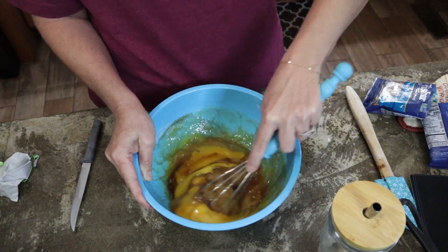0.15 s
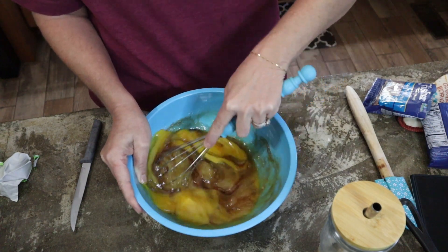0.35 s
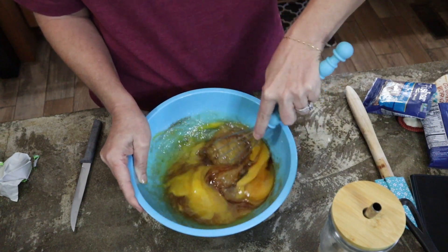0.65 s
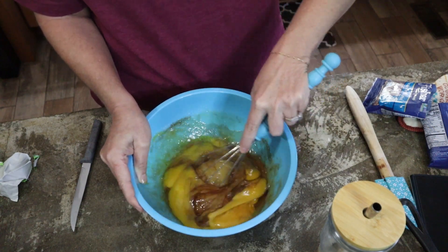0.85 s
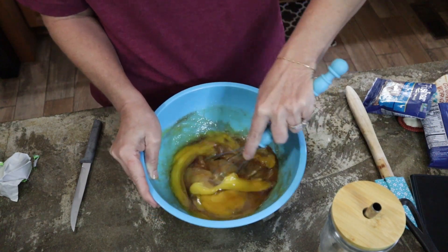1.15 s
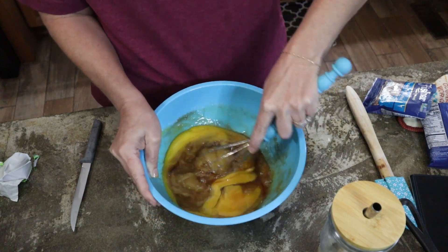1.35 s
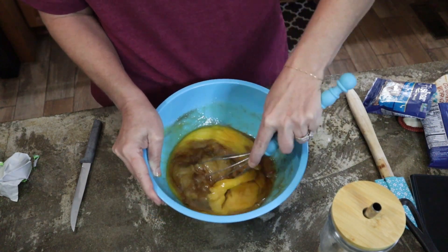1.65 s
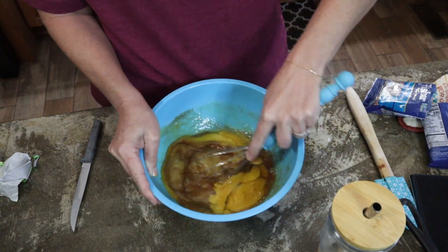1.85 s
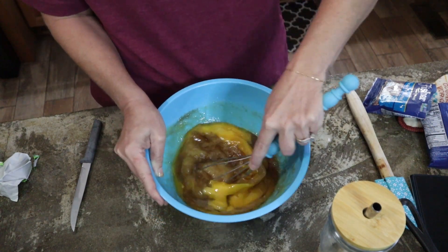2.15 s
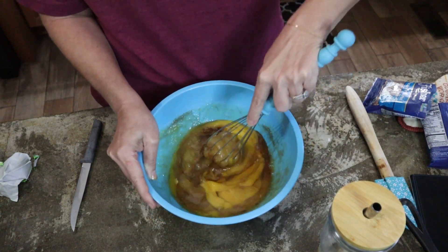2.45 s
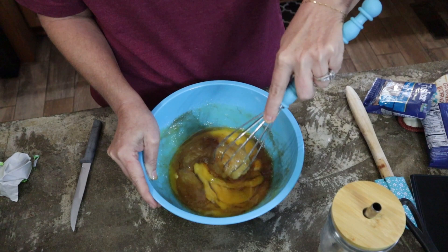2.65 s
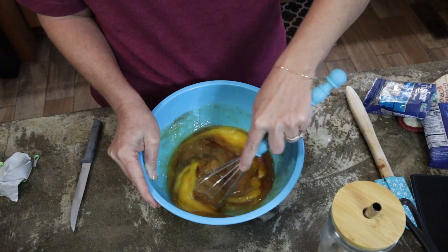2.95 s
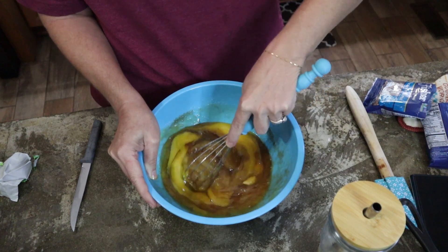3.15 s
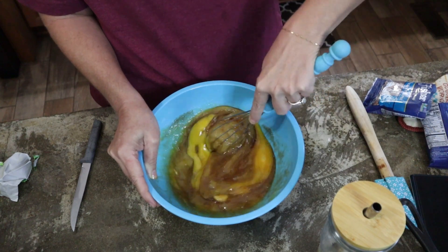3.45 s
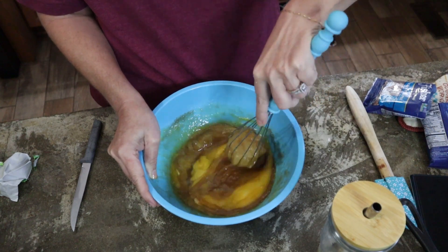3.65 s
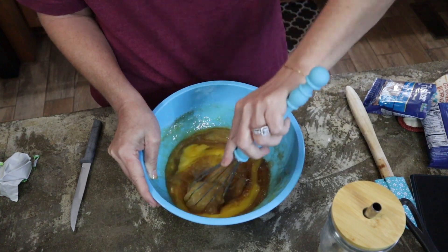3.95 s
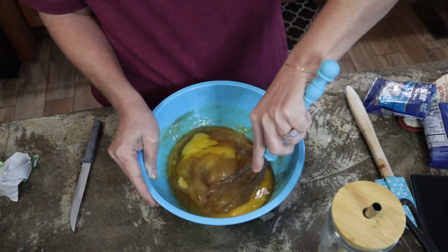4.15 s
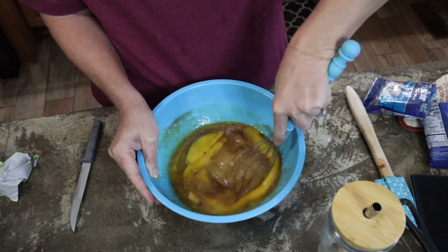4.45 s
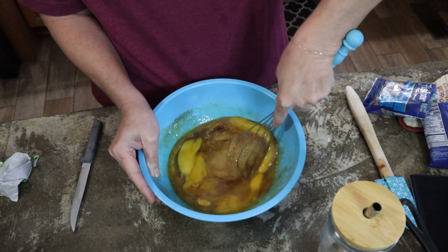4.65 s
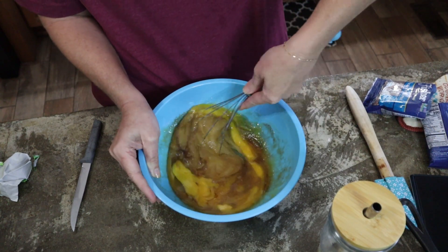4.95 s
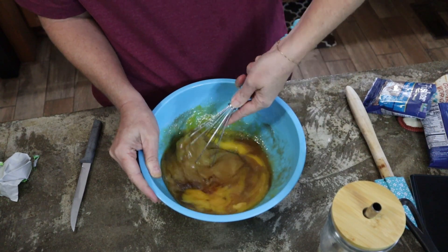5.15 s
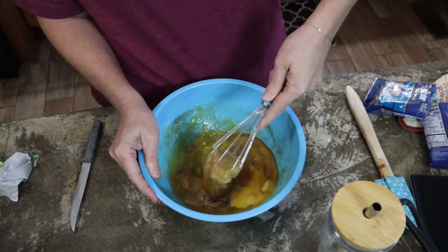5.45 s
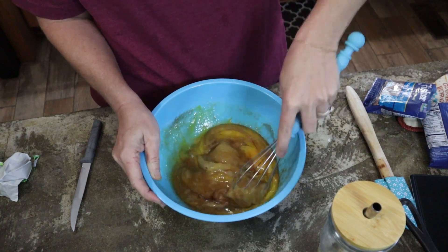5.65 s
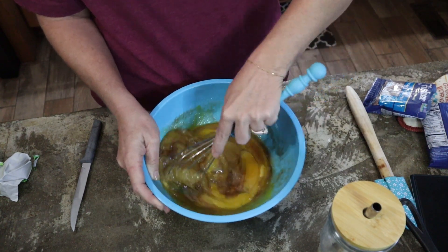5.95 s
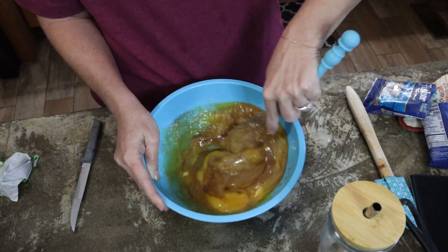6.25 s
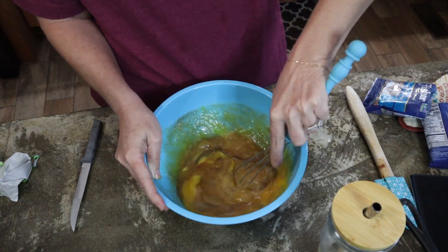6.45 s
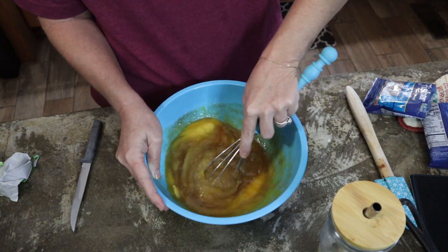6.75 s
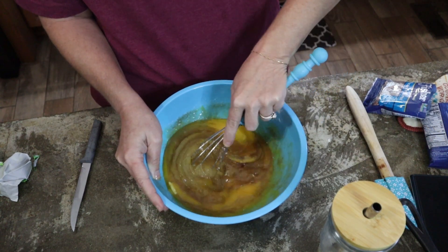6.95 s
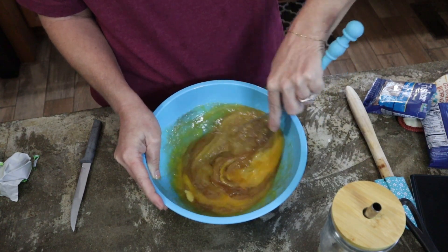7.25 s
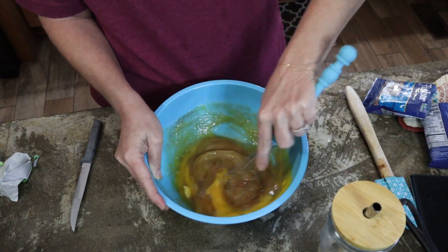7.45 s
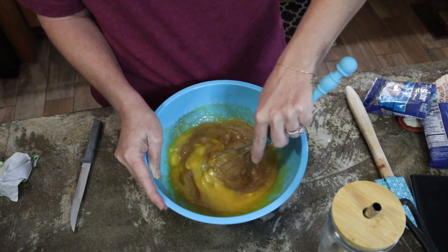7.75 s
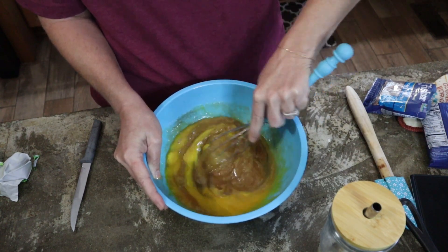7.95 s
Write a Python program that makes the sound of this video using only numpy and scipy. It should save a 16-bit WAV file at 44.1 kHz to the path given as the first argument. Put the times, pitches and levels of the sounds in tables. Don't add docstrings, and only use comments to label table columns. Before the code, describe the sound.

A close stereo microphone hears whisking in a small kitchen with short wall reflections, low hum and soft hiss. Throughout, a wind-up timer further off ticks and tocks a little over four times a second, slightly limping. A whisk rasps softly at 0.3 s and knocks the plastic bowl at 0.5 s. The strongest hollow thump comes at 1.2 s, followed by heavy rubbing, rumble and knocks at 1.5 and 2.0 s, and the rim landing at 2.55 s. A very sharp, bright wire click springs out at 2.9 s. Lighter wet scraping follows to 4.7 s, then a cluster of metallic snaps and a sticky suck around 4.9 s. Further rasps and pings come at 5.9 s, a loud short twang at 6.2 s, then softer drags, light touches and snaps around 7.1-7.3 s, ending with brief scrapes near 7.8-8 s.

```python
import sys
import numpy as np
from scipy import signal
from scipy.fft import rfft, irfft, next_fast_len
from scipy.io import wavfile

SR = 44100
rng = np.random.default_rng(int(sys.argv[2]) if len(sys.argv) > 2 else 0)


def convert_level_to_amplitude(level_db):
    exponent = np.asarray(level_db, float) / 20
    return 10 ** exponent


def generate_wav(sig):
    pcm = np.round(np.clip(np.atleast_2d(sig).T, -1, 1) * 32767).astype(np.int16)
    wavfile.write(sys.argv[1], SR, pcm)


N = 356769

# (frequency [Hz], density [dB per Hz])
ROOM = [(12, -61), (20, -24), (60, -9), (86, -17), (128, -7.5), (212, -9.5), (332, -10), (440, -12.5),
        (479, -13.5), (1180, -18.5), (1650, -22), (3060, -23.5), (12800, -32), (15200, -28), (16500, -53)]
# (frequency [Hz], likeness [0..1])
LIKENESS = [(60, 0.95), (180, 0.68), (550, 0.23), (1650, 0.28), (4970, 0.5), (15000, 0.52)]
ROOM_DB = -53
HUM_HZ, HUM_T60_S, HUM_DB = 123.5, 0.21, -58.5

# (start [s], length [s], wet scrape [dB], brightness [dB], load on bowl [dB])
DRAGS = [(0.0, 0.029, -60, 2, -71), (0.294, 0.019, -46, -4, -55), (0.337, 0.35, -53.5, -7, -51.5),
         (1.421, 0.15, -50.5, -7.5, -41), (0.789, 0.13, -54, -5, -47), (0.953, 0.41, -47.5, -11.5, -41.5),
         (1.098, 0.12, -61, -24, -34.5), (1.49, 0.85, -46, -11, -39), (1.799, 0.05, -46, -7, -43),
         (2.9, .03, -75, -1, -61), (3.025, 0.47, -56.5, -10.5, -55), (4.082, 0.5, -55, -3, -53.5),
         (4.644, 0.38, -57.5, -3, -55.5), (4.859, 0.035, -50, -1.5, -62), (4.915, .09, -50.5, -0.5, -64),
         (4.999, 0.055, -48.5, -2.5, -65), (6.22, .035, -53, 5.5, -62), (5.105, 0.13, -53.5, -9, -54.5),
         (5.789, 0.04, -50.5, -4.5, -49), (5.865, 0.057, -50, -0.5, -51.5), (5.974, 0.22, -55.5, -7, -52),
         (6.155, 0.22, -54, 1.5, -52.5), (6.406, 0.16, -53.5, -7.5, -48.5), (6.617, 0.64, -56, -7.5, -52.5),
         (7.275, 0.17, -54, 3.5, -54), (7.792, 0.055, -47.5, -6.5, -44), (7.894, 0.033, -53, -9, -51),
         (7.96, .05, -52, -7, -51)]
# (start [s], length [s], rumble [dB])
SHOVES = [(0.326, 0.022, -42), (0.367, 0.047, -43), (0.793, 0.055, -46), (1.365, .03, -43.5),
          (1.646, 0.078, -41.5), (1.895, 0.034, -35.5), (2.387, 0.014, -42.5), (2.978, 0.041, -55),
          (5.124, 0.066, -52.5), (5.804, 0.074, -49), (5.96, 0.031, -45.5), (6.99, 0.16, -65),
          (7.513, 0.29, -57.5)]
DRAG_ATTACK_S, DRAG_RELEASE_DB_PER_S = 0.01, 152
STIRRING_DB = -66.5
RUMBLE_DB = -11
HEAVY_DB, RUMBLE_GROWTH = -42, 0.21
ROCK_DB, ROCK_DB_PER_S = -15.5, 259
# (frequency [Hz], density [dB per Hz])
SCRAPE = [(530, 1.5), (900, 0.5), (1180, -3.5), (1470, -7), (1900, -4), (2880, -7), (3220, -1), (4600, -8),
          (5440, -9), (6010, -10.5), (7860, -17), (8990, -10.5), (13000, -7)]
# (frequency [Hz], level [dB])
WIRES = [(2250, -20), (3250, -28), (4400, -16), (5300, -14), (7900, -1.5)]

# (time [s], peak [dB], wire pitch [Hz], wall pitch [Hz], wall share [dB])
TAPS = [(0.0176, -33, 6330, 1140, -7), (2.248, -38, 5430, 1040, 5), (2.896, -33, 6600, 3030, -26),
        (2.9, -29, 3520, 1800, -8), (4.251, -33, 4800, 1450, -3), (4.107, -44, 3100, 1440, 0),
        (4.1666, -42, 2400, 1240, 3), (4.2255, -44, 2600, 1140, 2), (5.233, -40, 5040, 3000, -14),
        (4.869, -22.5, 7700, 3600, -5), (4.871, -21.5, 7500, 4300, -9), (4.887, -26, 4140, 1530, -7),
        (4.9412, -35, 3400, 2500, -6), (5.065, -30, 7300, 2020, -14), (5.154, -33, 6200, 1050, -17),
        (5.197, -41.5, 4230, 1200, 7), (5.8393, -36, 5130, 2460, -15), (1.612, -40, 3200, 1800, 9),
        (1.648, -42, 3000, 2190, 9), (2.18, -36, 3600, 1200, -13), (2.31, -40.5, 3200, 1100, 10.5)]
# (time [s], peak [dB], wire pitch [Hz], wall pitch [Hz], wall share [dB])
RASPS = [(0.311, -27, 3600, 1020, -5.5), (0.416, -28.5, 3480, 1100, -10.5), (0.5885, -43, 4410, 2230, 2.5),
         (0.894, -36, 7450, 2360, -3), (3.0112, -27, 8050, 1260, -11), (3.249, -51, 4300, 980, 8.5),
         (4.974, -29, 3600, 2160, -21), (4.98, -27.5, 3900, 2540, -14), (5.13, -37, 5700, 1750, -1),
         (5.655, -32.5, 4530, 3130, -31), (5.874, -26, 8650, 6270, -13), (5.97, -28.5, 4050, 1100, -8),
         (6.187, -29, 8100, 2640, -16), (6.3672, -31, 3940, 1020, -9), (7.1708, -32, 5150, 2450, -19),
         (7.274, -28, 4500, 2830, -8), (7.7978, -29.5, 8700, 960, -3), (7.852, -33, 3250, 1850, 1),
         (7.977, -45.5, 4010, 1710, 5), (7.992, -46, 3500, 1300, 5), (1.329, -45, 3150, 1900, 8)]
# (time [s], peak [dB], wire pitch [Hz], wall pitch [Hz], wall share [dB])
PINGS = [(3.0065, -36, 4100, 2300, 0), (3.0088, -34.5, 4000, 2100, 1.5), (3.0128, -30, 4160, 1240, -5),
         (3.017, -36, 4200, 1000, -5), (3.021, -37, 4300, 1300, -4), (5.8743, -23.5, 4200, 1303, -6),
         (5.878, -25.5, 4170, 1250, -11), (5.88, -30, 4700, 2500, -5), (7.2718, -29.5, 3400, 2050, 3),
         (5.797, -42, 4100, 1000, -1), (5.81, -45, 4050, 1100, -4), (5.826, -43, 4100, 5530, -3),
         (5.848, -42, 4100, 2400, -6), (6.171, -38, 2800, 2500, 1), (0.707, -39, 3600, 4000, -6),
         (0.717, -39, 3550, 3100, -6), (7.8535, -39, 3240, 1940, 4), (6.211, -35, 2700, 2700, 1),
         (6.2785, -36.5, 4100, 2150, 7)]
# (time [s], peak [dB], wire pitch [Hz], wall pitch [Hz], wall share [dB])
DULL_TAPS = [
    (1.0892, -32.5, 3230, 2100, 1),
    (1.154, -32, 3400, 2300, 1),
    (1.179, -47, 2390, 1680, 1),
    (5.129, -41, 2400, 1710, 0),
]
# (time [s], peak [dB], wire pitch [Hz])
SNAPS = [(4.48, -44, 4360), (4.765, -30, 5030), (4.816, -31, 4200), (4.8724, -33, 7900), (5.403, -35, 7360),
         (6.631, -33.5, 3950), (7.0852, -27, 4150), (7.099, -30, 5200), (7.214, -31, 4780),
         (7.362, -31, 4000), (7.385, -41, 3630)]
# (time [s], peak [dB], pitch [Hz], second pitch [Hz], t60 [s])
SPRING = [
    (2.8995, -27, 14500, 12500, .003),
    (2.901, -24, 8300, 5500, 0.0088),
    (2.905, -30, 10300, 8800, 0.007),
    (2.9092, -32, 8600, 10300, 0.01),
    (2.914, -48, 10200, 8500, 0.11),
    (4.8855, -31, 11500, 14500, 0.0045),
    (4.983, -25, 10500, 14000, .008),
    (5.2626, -26, 7850, 10000, 0.0031),
]
# (time [s], peak [dB], pitch [Hz], second pitch [Hz], t60 [s])
TWANGS = [
    (6.2224, -17.5, 7750, 7500, .007),
    (6.2331, -36, 8000, 9200, .05),
    (5.0846, -20, 5100, 5700, .004),
]
# (time [s], peak [dB])
CLICKS = [(2.8996, -9), (2.9002, -11.5), (2.9012, -19), (5.8748, -25), (5.8785, -19), (3.0135, -28),
          (2.6, -33), (4.8698, -20), (4.8722, -22), (4.8875, -18), (4.942, -29), (4.9835, -25),
          (4.921, -33), (6.5, -33), (0.3125, -26), (7.799, -27), (7.8545, -32), (7.844, -35), (6.272, -33),
          (7.9, -35)]
# (frequency [Hz], level [dB], t60 [s])
CLICK = [(1490, -8, 0.0025), (2700, -7, .002), (4300, -4, .0015), (6200, -1, 0.0013), (8300, 1.5, 0.0018),
         (10200, -1, 0.0011), (14500, -4, .001)]
TAP_T60_S, SNAP_T60_S, RASP_T60_S, PING_T60_S = .005, .008, 0.032, .012
SNAP_WALL_HZ, SNAP_WALL_DB = 1110, -12.5
SPRING_SECOND_DB = -6

# (frequency [Hz], level [dB], t60 [s])
TIMER = [(2370, -16, 0.0034), (3130, 1, 0.046), (3690, 7, 0.024), (4360, 10, 0.019), (4440, 3, 0.015),
         (4790, 19.5, 0.0063), (5700, 18.5, 0.0041), (7380, 11.5, 0.024), (7900, -1, 0.017),
         (8300, 13, 0.024), (8250, -21, 0.045), (10200, -1, 0.0052)]
FIRST_TICK_S, TOCK_AFTER_S, SWING_S = .0742, .2298, .44826
TICK_DB, TICK_UPPER_DB, TICK_LOWER_DB = -42, -3, 5.5
TOCK_DB, TOCK_UPPER_DB, TOCK_LOWER_DB = -42.5, -0.5, 2

# (time [s], peak [dB], counter share [dB], wall share [dB])
KNOCKS = [(0.31, -35.5, -9, -20), (0.477, -20.5, -19, -6), (0.59, -34.5, -25, -27), (0.927, -25, -9.5, -9),
          (0.97, -52, 12, -12), (1.089, -30.5, -22, -12), (1.1553, -26, -20, -4), (1.18, -11, -16, -10.5),
          (1.476, -27, -10, -11), (1.509, -15.5, -14, -6), (1.681, -28, -16, -22), (1.739, -30, -14, -19),
          (1.793, -34, -14, -15), (1.962, -19, -12.5, -6.5), (2.133, -29, -38, -8),
          (2.165, -23.5, -17, -20), (2.555, -25, -3, -5), (3.013, -38.5, -7, -22), (5.525, -39, -27, -30),
          (5.874, -35, -15, -30), (6.19, -35.5, -14, -29), (6.223, -31.5, -25, -35),
          (6.272, -34.5, -26, -41), (6.364, -34, -29, -26), (6.448, -41, -32, -30), (6.576, -36, -36, -24),
          (7.085, -39.5, -11, -25), (7.273, -32.5, -19, -38), (7.798, -37, -30, -15), (7.852, -48, -25, 1)]
# (time [s], peak [dB])
NUDGES = [(1.337, -43), (1.377, -37), (1.445, -38), (1.572, -38), (1.647, -48), (1.714, -37), (1.812, -38),
          (1.83, -35), (1.883, -33), (1.918, -42), (2.903, -43.5), (2.012, -33), (2.087, -38), (2.213, -32),
          (2.261, -36), (2.35, -43), (0.375, -42), (5.915, -38), (5.927, -58), (6.171, -42), (6.213, -45),
          (6.28, -35), (6.297, -44), (6.552, -46), (6.633, -48), (6.805, -41), (7.173, -43.5), (7.385, -43),
          (7.483, -46), (7.435, -46), (7.56, -53), (7.6, -48), (7.71, -47), (2.65, -43.5), (0.52, -38),
          (1.135, -36), (1.25, -33), (7.83, -41), (7.913, -51)]
NUDGE_COUNTER_DB, NUDGE_WALL_DB = -15.5, -23
# (frequency [Hz], level [dB], t60 [s])
COUNTER = [(84, -36, 0.042), (92, -7, 0.16), (122.5, 4.5, 0.099)]
# (frequency [Hz], level [dB], t60 [s])
WALL = [(227, -3.5, 0.057), (290, 2.5, 0.049), (352.5, 0.5, 0.025)]
# (frequency [Hz], level [dB], t60 [s])
CAVITY = [(414, -15, 0.093), (496.6, -1.5, 0.096), (595, -2.5, 0.084), (663, 5, 0.076), (705, 8, 0.021),
          (835, -6, 0.057), (880, -20.5, 0.1), (958, -5.5, 0.029), (1186, -6, 0.018), (1290, -26, 0.068),
          (1690, -19, 0.0072)]
# (time [s], peak [dB])
SLAPS = [(0.927, -33), (1.0895, -26), (1.1549, -13.5), (1.1807, -12.5), (1.509, -28), (1.681, -29),
         (1.9622, -22), (2.132, -38), (2.166, -34), (7.803, -33), (7.665, -36)]
# (frequency [Hz], level [dB], t60 [s])
SLAP = [(640, -5, 0.013), (804, 0.5, 0.014), (1084, -3, 0.013), (1450, -23.5, 0.0079), (1850, -19, 0.0086)]
# (time [s], peak [dB])
RIM_HITS = [
    (2.5562, -17),
    (0.3125, -31.5),
    (7.8535, -38),
]
# (frequency [Hz], level [dB], t60 [s])
RIM = [(430, 0, 0.057), (722, 1, 0.052), (1180, -19, 0.047)]
PAD_HZ = 2100

# (start [s], length [s], level [dB])
SLOSHES = [
    (3.2, 0.079, -58),
    (4.878, 0.19, -54),
    (5.8, 0.16, -60),
    (6.153, .06, -54),
    (6.27, 0.068, -55),
    (7.29, 0.04, -61),
    (7.852, 0.026, -63),
    (7.96, 0.052, -65),
    (7.648, 0.018, -59),
]
KITCHEN_T60_S, WALL_CUT_HZ = 0.26, 11000
BASS_CUT_HZ = 87


def rms_one(x):
    return x / np.sqrt(np.mean(x ** 2) + 1e-20)


def at_hz(points, hz):
    table_hz, value = np.array(points).T
    return np.interp(np.log(hz), np.log(table_hz), value)


def drift(rate):
    r = np.exp(-80 * np.pi * rate / SR)
    slow = signal.lfilter([1], [1, -2 * r, r * r], rng.standard_normal(N // 40 + 2002))[2000:]
    return np.interp(np.arange(N) / 40, np.arange(len(slow)), rms_one(slow))


def ring(clicks, hz, t60):
    r, w = convert_level_to_amplitude(-60 / (max(t60, .001) * SR)), 2 * np.pi * hz / SR
    return signal.lfilter([0, np.sin(w)], [1, -2 * r * np.cos(w), r * r], clicks + 1e-18)


def colour(x, spectrum):
    size = next_fast_len(N)
    hz = np.maximum(np.arange(size // 2 + 1) * SR / size, 1)
    return irfft(rfft(x, size) * convert_level_to_amplitude(at_hz(spectrum, hz)), size)[..., :N]


def filtered(x, order, hz, kind):
    return signal.sosfilt(signal.butter(order, hz, kind, fs=SR, output="sos"), x)


def grains(per_s, spread_db):
    sizes = convert_level_to_amplitude(spread_db * np.minimum(rng.exponential(1, N), 5)) * rng.choice([-1, 1], N)
    return rms_one(sizes * (rng.random(N) < per_s / SR))


def pair(x, lead):
    turn = np.exp(1j * np.pi * lead * np.arange(len(x) // 2 + 1) / len(x))
    return irfft(rfft(x) * np.array([turn, 1 / turn]), len(x))


def struck(hits, modes):
    clicks = np.zeros(N)
    s, peak_db = np.transpose(hits)
    clicks[(s * SR).astype(int)] = convert_level_to_amplitude(peak_db - 6.5)
    return sum(convert_level_to_amplitude(db) * ring(clicks, hz, t60) for hz, db, t60 in modes)


def held(t, s, length):
    attack = np.clip((t - s) / DRAG_ATTACK_S, 0, 1)
    return attack * convert_level_to_amplitude(-DRAG_RELEASE_DB_PER_S * np.maximum(t - s - length, 0))


def room_tone():
    shared, left, right = rng.standard_normal((3, N))
    likeness = [(hz, np.clip(c, .01, .99)) for hz, c in LIKENESS]
    alike = [(hz, 10 * np.log10(c)) for hz, c in likeness]
    apart = [(hz, 10 * np.log10(1 - c)) for hz, c in likeness]
    both = colour(shared, alike) + colour(np.array([left, right]), apart)
    return convert_level_to_amplitude(ROOM_DB) * rms_one(colour(both, ROOM))


def hum():
    return convert_level_to_amplitude(HUM_DB) * rms_one(ring(rng.standard_normal(N), HUM_HZ, HUM_T60_S))


def drags():
    t = np.arange(0, N / SR + .004, .002)

    def total(level_db, s, length):
        return ((convert_level_to_amplitude(level_db) * held(t, s, length)) ** 2).sum(axis=0)

    s, length, wet_db, bright_db, load_db = np.array(DRAGS).T[:, :, None]
    stirring = convert_level_to_amplitude(2 * STIRRING_DB)
    wet = total(wet_db, s, length) + stirring
    hiss = total(wet_db + bright_db, s, length) + stirring
    load = total(load_db, s, length) + stirring
    knock_s, peak_db = np.array(KNOCKS).T[:2, :, None]
    fall_db = ROCK_DB_PER_S * np.maximum(t - knock_s, 0)
    rocking = (t > knock_s) * convert_level_to_amplitude(peak_db + ROCK_DB - fall_db)
    s, length, shove_db = np.array(SHOVES).T[:, :, None]
    rumble = load * convert_level_to_amplitude(2 * RUMBLE_DB) * (load / convert_level_to_amplitude(2 * HEAVY_DB)) ** RUMBLE_GROWTH
    rumble = rumble + (rocking ** 2).sum(axis=0) + total(shove_db, s, length)
    layers = (rumble, load, wet, hiss)
    return [np.interp(np.arange(N) / SR, t, 10 * np.log10(power)) for power in layers]


def scrape(wet_db, hiss_db):
    pitches, dealt = np.geomspace(1100, 12000, 18), rng.integers(0, 18, N)
    slips = grains(5000, spread_db=2.5) * convert_level_to_amplitude(2.0 * drift(29))
    wires = np.zeros(N)
    for k, hz in enumerate(pitches):
        own_slips = slips * (dealt == k) * convert_level_to_amplitude(2.4 * drift(6.4))
        wires += ring(own_slips, hz, 21.0 / hz) * np.sqrt(hz)
    lasting = sum(convert_level_to_amplitude(db + 2.0 * drift(6)) * rms_one(ring(slips, hz, 22.0 / hz)) for hz, db in WIRES)
    both = colour(rms_one(wires) + lasting + .5 * slips, SCRAPE)
    low = rms_one(filtered(both, 4, 5700, "low"))
    high = rms_one(filtered(both, 4, 5700, "high"))
    return convert_level_to_amplitude(wet_db - 3.0) * low + convert_level_to_amplitude(hiss_db + 3.5) * high


def snaps(table, ring_s, crack_db, lead, band_hz=(1800, 10500)):
    out, t = np.zeros((2, N + 4096)), np.arange(4096) / SR
    for s, peak_db, wire_hz, wall_hz, wall_db, t60 in table:
        decay = convert_level_to_amplitude(-60 * np.maximum(t - .002, 0) / max(t60, .002)) * (t >= .002)
        burst = rng.standard_normal(4096) * decay
        push = np.diff(burst, prepend=0)
        wire = ring(push, wire_hz, ring_s)
        wall = ring(push, wall_hz, 2.44 * ring_s)
        crack = filtered(burst, 2, band_hz, "band")
        snap = wire / abs(wire).max() + convert_level_to_amplitude(crack_db) * crack / abs(crack).max()
        snap = snap / abs(snap).max() + convert_level_to_amplitude(wall_db) * wall / abs(wall).max()
        at = int((s - .0012) * SR)
        out[:, at:at + 4096] += convert_level_to_amplitude(peak_db + 0.5) * pair(snap, lead)
    return out[:, :N]


def wire_contacts():
    taps = [(*row, TAP_T60_S) for row in TAPS]
    single = [(*row, SNAP_WALL_HZ, SNAP_WALL_DB, SNAP_T60_S) for row in SNAPS]
    rasps = [(*row, RASP_T60_S) for row in RASPS]
    springs = [(*row, SPRING_SECOND_DB, t60) for *row, t60 in SPRING]
    twangs = [(*row, SPRING_SECOND_DB, t60) for *row, t60 in TWANGS]
    pings = [(*row, PING_T60_S) for row in PINGS]
    dull = [(*row, TAP_T60_S) for row in DULL_TAPS]
    out = snaps(taps, ring_s=.002, crack_db=0, lead=1.3)
    out += snaps(single, ring_s=.002, crack_db=-9, lead=1.3)
    out += snaps(rasps, ring_s=0.0035, crack_db=6.5, lead=1.6)
    out += snaps(springs, ring_s=.0016, crack_db=0, lead=1.6, band_hz=(4500, 16000))
    out += snaps(twangs, ring_s=.004, crack_db=-14, lead=1.6)
    out += snaps(pings, ring_s=.004, crack_db=-6, lead=1.6)
    out += snaps(dull, ring_s=.002, crack_db=-6, lead=1.3, band_hz=(1500, 3800))
    return out + pair(-np.diff(struck(CLICKS, CLICK), prepend=0), lead=1.6)


def beats():
    swings = FIRST_TICK_S + SWING_S * np.arange(int(N / SR / SWING_S))
    ticks = [(s, TICK_DB, TICK_UPPER_DB, TICK_LOWER_DB) for s in swings]
    return ticks + [(s + TOCK_AFTER_S, TOCK_DB, TOCK_UPPER_DB, TOCK_LOWER_DB) for s in swings]


def timer():
    out, t = np.zeros(N + 4096), np.arange(4096) / SR
    envelope = np.minimum(t / 0.0031, 1) * (convert_level_to_amplitude(-60 * t / 0.036) + 0.095 * convert_level_to_amplitude(-60 * t / 0.14))
    for s, level_db, upper_db, lower_db in beats():
        rattle = rng.standard_normal(4096) * envelope
        luck_db = rng.normal(0, 0.25, len(TIMER))
        ping = np.zeros(4096)
        for (hz, db, t60), chance_db in zip(TIMER, luck_db):
            share_db = (upper_db + 6) * (hz > 6500) + lower_db * (hz < 3400)
            ping += convert_level_to_amplitude(db + chance_db + share_db) * ring(rattle, hz, min(t60, 50 / hz))
        at = int((s - .002) * SR)
        out[at:at + 4096] += convert_level_to_amplitude(level_db - 5) * ping / np.sqrt(np.mean(ping[:400] ** 2))
    return out[:N]


def contacts():
    return np.array(KNOCKS + [(*row, NUDGE_COUNTER_DB, NUDGE_WALL_DB) for row in NUDGES])


def body(modes, strikes_db, rubbing, delay_s, soft_s):
    at = ((contacts()[:, 0] + delay_s) * SR).astype(int)
    luck = rng.normal(0, 1, (len(at), len(modes)))
    out = np.zeros(N)
    for k, (hz, level_db, t60) in enumerate(modes):
        sign = (-1) ** k
        clicks = np.zeros(N)
        clicks[at] = sign * convert_level_to_amplitude(strikes_db + 2 * luck[:, k])
        push = ring(clicks, hz, soft_s) * 2 * np.log(1000) / (soft_s * SR)
        out += convert_level_to_amplitude(level_db) * sign * ring(push + rubbing, hz, t60)
    return out


def bowl(rumble_db, drone_db):
    _, peak_db, counter_db, wall_db = contacts().T
    slips = grains(1200, spread_db=3.5) * convert_level_to_amplitude(2.0 * drift(48.0))
    drone = slips * convert_level_to_amplitude(drone_db - 31.0 + 0.8 * drift(32))
    cavity = body(CAVITY, peak_db - 9, drone, delay_s=0.00092, soft_s=0.0074)
    wall_rub = slips * convert_level_to_amplitude(rumble_db - 27)
    wall = body(WALL, peak_db + wall_db + 4.5, wall_rub, delay_s=0.00432, soft_s=0.043)
    slab_rub = slips * convert_level_to_amplitude(rumble_db - 30.5)
    slab = body(COUNTER, peak_db + counter_db + 6.0, slab_rub, delay_s=0.0081, soft_s=0.059)
    edges = filtered(struck(SLAPS, SLAP) + struck(RIM_HITS, RIM), 2, PAD_HZ, "low")
    return cavity + wall + slab + edges


def slosh():
    t = np.arange(0, N / SR + .004, .002)
    s, length, db = np.array(SLOSHES).T[:, :, None]
    gain = np.interp(np.arange(N) / SR, t, (convert_level_to_amplitude(db) * held(t, s, length)).sum(axis=0))
    pops, dealt = grains(700, spread_db=4.0) * convert_level_to_amplitude(6.1 * drift(17.5)), rng.integers(0, 6, N)
    pitches = np.geomspace(1800, 2900, 6)
    pockets = sum(ring(pops * (dealt == k), hz, 17.0 / hz) for k, hz in enumerate(pitches))
    return gain * rms_one(pockets)


def kitchen(x):
    t = np.arange(int(.3 * SR)) / SR
    tail = rng.standard_normal((2, len(t))) * convert_level_to_amplitude(-60 * t / KITCHEN_T60_S) * (t > .004)
    tail = filtered(tail, 1, [200, WALL_CUT_HZ], "band")
    tail = tail / np.sqrt((tail ** 2).sum(axis=1, keepdims=True))
    return signal.fftconvolve(x[None], tail, axes=1)[:, :N]


def scene():
    rumble_db, drone_db, wet_db, hiss_db = drags()
    high = scrape(wet_db, hiss_db) + slosh()
    snap, tick, low = wire_contacts(), timer(), bowl(rumble_db, drone_db)
    direct = pair(high, lead=1.48) * convert_level_to_amplitude([[-.5], [.5]]) + snap * convert_level_to_amplitude([[-.6], [.6]])
    direct = direct + pair(low, lead=2.8) + pair(tick, lead=0.79)
    reflected = kitchen(convert_level_to_amplitude(-15.0) * low + convert_level_to_amplitude(-9.0) * high + convert_level_to_amplitude(-9.5) * snap[0] + convert_level_to_amplitude(-3.5) * tick)
    near = filtered(direct + reflected, 4, BASS_CUT_HZ, "high")
    return near + room_tone() + hum()


def band_limit(x):
    return signal.sosfilt(signal.butter(12, 16830, fs=SR, output="sos"), x)


def record(dry):
    mix = dry + .0005
    return band_limit(mix)


dry = scene()
out = record(dry)
generate_wav(out)
```